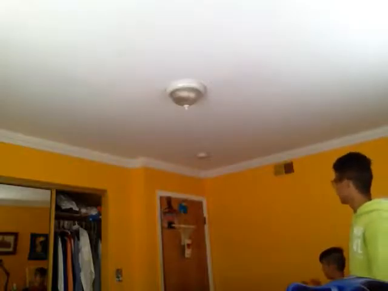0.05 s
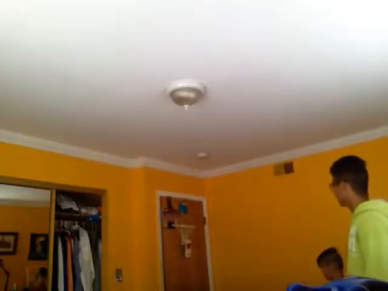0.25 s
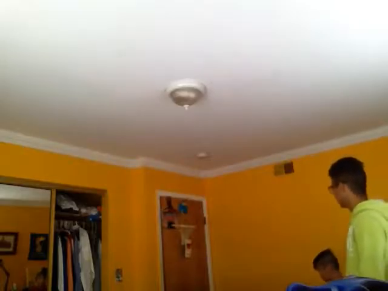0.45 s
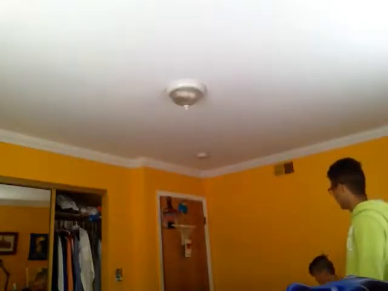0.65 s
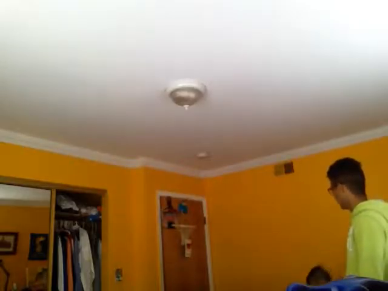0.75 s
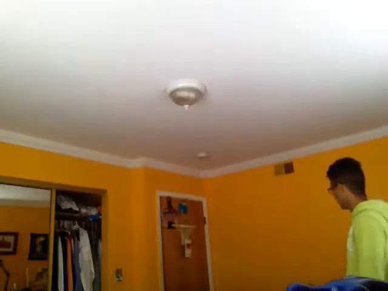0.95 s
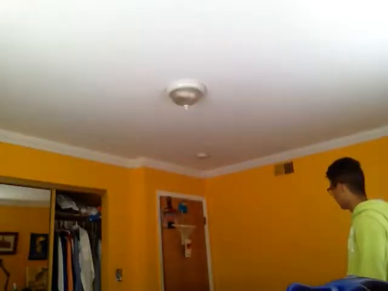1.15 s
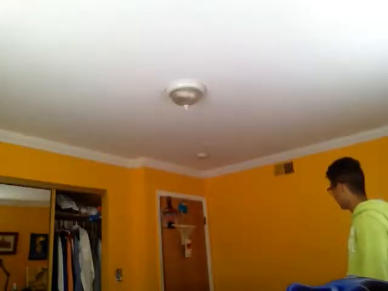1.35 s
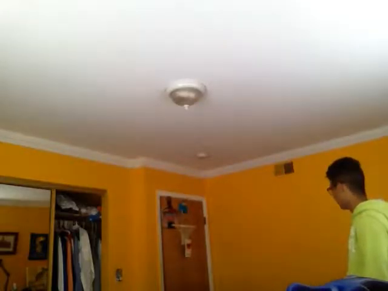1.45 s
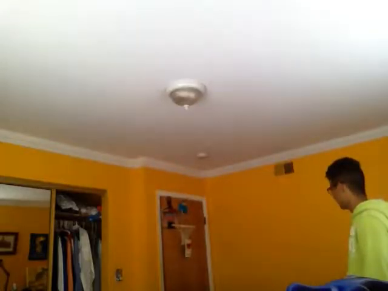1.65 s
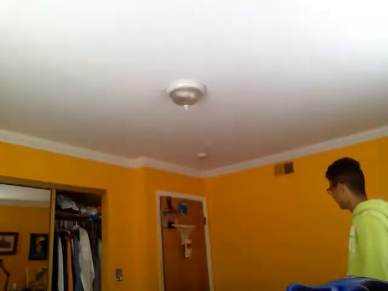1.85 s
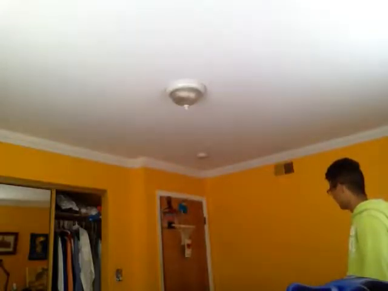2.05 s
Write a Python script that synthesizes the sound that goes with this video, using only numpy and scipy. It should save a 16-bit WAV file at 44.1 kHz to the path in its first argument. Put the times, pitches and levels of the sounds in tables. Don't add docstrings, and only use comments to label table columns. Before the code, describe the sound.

A small rubber basketball bounces on a bedroom's wooden floor, a few metres from the microphone. A low ring fades at the start over soft hum, with faint cloth and shoe squeaks. The loudest, snapping bounce lands at 0.4 s; softer ones follow at 0.9, 1.25, 1.55 and 1.9 s, with short boomy echoes. Palm pats come near 1.0, 1.45 and 1.7 s, with faint rustles and floor groans.

```python
import sys
import numpy as np
from scipy import signal
from scipy.fft import rfft, irfft
from scipy.io import wavfile
from scipy.ndimage import uniform_filter1d

SR = 44100
rng = np.random.default_rng(int(sys.argv[2]) if len(sys.argv) > 2 else 0)


def pcm_store(signal):
    levels = np.round(np.clip(np.atleast_2d(signal), -1, 1) * 32767)
    wavfile.write(sys.argv[1], SR, levels.astype(np.int16).T)


def boost_factor(decibels):
    exponent = np.asarray(decibels, float) / 20
    return 10 ** exponent


N = 92169


def read(points, hz):
    f, value = np.transpose(points)
    return np.interp(np.log(hz + 1), np.log(f + 1), value)


def evened(x):
    return x / np.sqrt(np.mean(x ** 2) + 1e-20)


def rise(t, rise_s):
    return 1 - np.exp(-(t / rise_s) ** 2)


def decay(db, t, t60):
    return boost_factor(db - 60 * t / t60)


def add(mix, s, sound):
    part = mix[max(round(s * SR), 0):][:len(sound)]
    part += sound[:len(part)]


def coloured(points, size):
    spectrum = rfft(rng.standard_normal(size))
    gain = boost_factor(read(points, np.fft.rfftfreq(size, 1 / SR)))
    return evened(irfft(spectrum * gain, size))


BEAT_DB, BEAT_CYCLES = 3, 5.94


def modes(table, t, build_s, cycles, spread):
    hz, db, t60 = np.transpose(table)[:, :, None]
    detune, phase, beat_speed, beat_phase = rng.random((4, len(table), 1))
    hz = hz * (1 + spread * (detune - 0.5))
    swell = rise(t, abs(build_s) + abs(cycles) / hz + 1e-4)
    beat_turns = hz * t * (0.5 + beat_speed) / BEAT_CYCLES + beat_phase
    beat_db = BEAT_DB * np.sin(2 * np.pi * beat_turns)
    tones = np.sin(2 * np.pi * (hz * t + phase))
    return (swell * decay(db + beat_db, t, t60) * tones).sum(0)


# f/Hz, t60/s
ROOM = [(200, 0.39), (600, 0.35), (1500, 0.34), (4000, 0.29), (8000, 0.33), (15000, .2)]


def tail(points, t, rise_s):
    hz, s, bands = signal.stft(coloured(points, len(t)), SR, nperseg=256)
    bands = bands * decay(0, s, read(ROOM, hz)[:, None])
    out = signal.istft(bands, SR, nperseg=256)[1][:len(t)]
    return out * rise(t, rise_s)


# t/s, level/dB, boom below 200 Hz/dB, floor ring/dB, snap/dB
BOUNCES = [
    (0.4095, -7.5, -4, -3, -0.5),
    (0.9168, -15, -6, -5, -1),
    (1.2404, -16.5, 0, 1.5, -1.5),
    (1.5638, -13.5, 2.5, -8.5, -0.5),
    (1.8876, -17.5, 1.5, -1.5, -3.5),
]
# crack f/Hz, crack/dB, fizz above 5 kHz/dB, board ring/dB, thud/dB
SPOTS = [
    (2480, -8, 1.5, -3.5, -14),
    (2110, -8, 4.5, -0.5, -20),
    (1010, 0, 6, -4, -16),
    (2220, -0.5, -1.5, -12.5, -12),
    (1490, -9, 1.5, -9, -14),
]
# f/Hz, level/dB, t60/s
BOOM = [(90.2, -6.5, 0.29), (115.4, -5.5, 0.31), (149.1, -4.5, 0.24), (170.8, -9, 0.36)]
# f/Hz, level/dB, t60/s
RING = [(208, -20.5, 0.54), (240.3, -11, 0.31), (414.1, -15.5, 0.22), (478.4, -10, 0.21),
        (520, -15.5, 0.23), (579.8, -18.5, .25), (645, -26, 0.46), (719, -22.5, 0.31), (749.6, -17.5, 0.24)]
# f/Hz, level/dB, t60/s
BOARD = [(304.3, 0, 0.23), (327.2, -17, 0.39)]
# f/Hz, level/dB, t60/s
SHELL = [(463, -8, 0.014), (1230, 2, 0.024), (1720, -7, 0.031), (2630, -7.5, .012), (3090, -9.5, 0.011),
         (4540, -14, .008), (7010, -24, .02)]
# f/Hz, level per Hz/dB
TOUCH = [(500, -8), (1300, 0), (2300, -4), (4000, -26), (15000, -55)]
# f/Hz, level per Hz/dB
CLICK = [(600, -22), (1500, 3), (3800, -3), (5200, -12), (6500, -28), (15000, -45)]
# delay/s, level/dB
ECHOES = [(0, 1.5), (.0042, -4), (.0057, -4), (.0085, -46), (0.0109, -22), (0.014, -16)]
# f/Hz, level per Hz/dB
WASH = [(200, -5), (400, -9), (700, -10), (900, -16), (1200, -13), (2500, -19.5), (7000, -30.5),
        (15500, -42)]
LEAD_S, SNAP_RISE_S = 0.0042, 0.0007
BUILD_CYCLES = 2.16
PUSH_DB, SHELL_DB, WASH_DB = -15.5, -10, -10.5
TINT_DB, TINT_OCTAVES = 3.5, 0.45


def bounce(s, db, boom_db, ring_db, snap_db, crack_hz, crack_db, fizz_db, board_db, thud_db):
    t = np.arange(SR // 2) / SR
    out = boost_factor(boom_db) * modes(BOOM, t, 0.0017, BUILD_CYCLES, 0.019)
    out += boost_factor(ring_db) * modes(RING, t, 0.0013, BUILD_CYCLES, 0.029)
    out += boost_factor(board_db) * modes(BOARD, t, 0.0045, 2.76, 0.01)
    thud_shape = (t / 0.015) ** 2 * np.exp(2 - 2 * t / 0.013)
    out += boost_factor(thud_db) * thud_shape * np.cos(2 * np.pi * 70 * t)
    push = np.sin(2 * np.pi * 520 * t) * np.minimum(t / 0.00055, 1)
    out += decay(PUSH_DB, t, 0.12) * push

    u = t[:2000]
    out[:2000] += decay(snap_db - 24, u, 0.04) * rise(u, 0.0012) * coloured(TOUCH, len(u))
    crack = decay(crack_db, u, 0.011) * np.sin(2 * np.pi * crack_hz * u)
    crack += decay(-4.5, u, 0.0058) * coloured(CLICK, len(u))
    crack *= rise(u, SNAP_RISE_S)
    for delay, echo_db in ECHOES:
        shell = boost_factor(SHELL_DB) * modes(SHELL, u, SNAP_RISE_S, 0, 0.056)
        arrival_s = LEAD_S - SNAP_RISE_S + delay * rng.uniform(0.9, 1.1)
        add(out, arrival_s, boost_factor(snap_db + echo_db) * (crack + shell))

    wash = []
    for hz, level_db in WASH:
        octaves_off = np.log2(hz / crack_hz)
        tint_db = TINT_DB * np.exp(-(octaves_off / TINT_OCTAVES) ** 2)
        wash.append((hz, level_db + fizz_db * (hz > 5000) + tint_db))
    add(out, 0.7 * LEAD_S, boost_factor(WASH_DB + 1.38 * snap_db) * tail(wash, t, 0.0043))
    return s - LEAD_S, boost_factor(db) * out


# t/s, level/dB, build-up/s, brightness/dB
PATS = [
    (1.012, -21, 0.00062, 1),
    (1.4535, -27, 0.0029, -0.5),
    (1.734, -35, .002, 5),
    (.215, -45, 0.002, 2.5),
]
# f/Hz, level/dB, t60/s
PALM = [(151.2, -13.5, 0.33), (212.7, -4.5, 0.35), (282, -4.5, 0.21), (387.3, -5, 0.15), (489, -15, 0.14),
        (575, -20, 0.37), (645, -14.5, 0.27), (1020, -14, 0.067)]
# f/Hz, level per Hz/dB
PAT_WASH = [(150, -7), (400, 6.5), (1000, -4), (2000, -18.5), (5000, -34), (15000, -37)]


def pat(s, db, build_s, bright_db):
    t = np.arange(SR // 2) / SR
    slap = decay(4, t, 0.04) * np.sin(2 * np.pi * 330 * t) * rise(t, 0.004)
    ring = modes(PALM, t, build_s, 0.8, 0.024)
    wash = boost_factor(bright_db - 9.5) * tail(PAT_WASH, t, build_s + 0.0042)
    return s, boost_factor(db) * (slap + ring + wash)


# t/s, length/s, level/dB, f/Hz
GROANS = [
    (1.75, 0.075, -29, 213),
    (1.11, 0.05, -36, 198),
    (1.16, 0.034, -47, 207),
    (0.597, .08, -50.5, 82),
]


def groan(s, length, db, hz):
    t = np.arange(0, length, 1 / SR)
    drift = uniform_filter1d(rng.standard_normal((2, SR)), 600)
    waver, flutter = evened(uniform_filter1d(drift, 600))[:, :len(t)]
    swell = boost_factor(db + 2 * flutter) * np.sin(np.pi * t / length) ** 1.6
    turns = np.cumsum(hz * (1 + 0.025 * waver)) / SR
    return s, swell * np.sin(2 * np.pi * turns)


# t/s, length/s, level/dB, low f/Hz, high f/Hz
RUSTLES = [
    (0.061, 0.17, -56, 365, 740.7),
    (0.29, 0.45, -58, 370, 3241),
    (1.0, 0.27, -61, 4000, 14900),
    (1.062, 0.15, -54.5, 800, 3800),
    (1.735, .13, -49.5, 833.3, 2600),
    (1.73, 0.14, -56.5, 4320, 13200),
    (1.187, 0.11, -56.5, 4630, 14000),
    (1.762, 0.11, -49, 60, 131),
    (1.931, .1, -45.5, 520, 730),
]
# t/s, length/s, level/dB, low f/Hz, high f/Hz
TICKS = [
    (1.016, .008, -51, 8000, 15000),
    (1.117, .012, -59, 5000, 11000),
    (1.177, .007, -54, 3800, 5200),
    (1.181, .006, -60, 8000, 9800),
    (1.199, .007, -50, 7500, 13000),
    (1.201, .007, -59, 3800, 5000),
    (1.225, .008, -60, 7000, 14000),
    (1.469, .008, -56, 1800, 3200),
]


def rustle(s, length, db, low_hz, high_hz):
    t = np.arange(0, length, 1 / SR)
    unevenness = evened(uniform_filter1d(rng.standard_normal(SR), 150))[:len(t)]
    grain = rng.standard_normal(len(t)) * boost_factor(0.74 * unevenness)
    sos = signal.butter(2, [low_hz, min(high_hz, 15900)], "bandpass", fs=SR, output="sos")
    band = signal.sosfilt(sos, grain)
    return s, boost_factor(db) * evened(band) * np.sin(np.pi * (t / length) ** 0.48)


# t/s, length/s, level/dB, f/Hz
SQUEAKS = [
    (0.105, .13, -62.5, 1787),
    (0.318, 0.11, -55, 1812),
    (1.332, 0.067, -52.5, 1760),
    (1.392, 0.076, -64, 1840),
]


def squeak(s, length, db, hz):
    t = np.arange(0, length, 1 / SR)
    sos = signal.butter(2, 110, fs=SR, output="sos")
    slow = signal.sosfilt(sos, rng.standard_normal((2, SR)))[:, 4000:][:, :len(t)]
    whistle = ((slow[0] + 1j * slow[1]) * np.exp(2j * np.pi * hz * t)).real
    return s, boost_factor(db) * np.sin(np.pi * t / length) ** 0.5 * evened(whistle)


def fading():
    t = np.arange(SR // 4) / SR
    ring = np.cos(2 * np.pi * 165 * t) + 0.52 * np.cos(2 * np.pi * 215 * t)
    ring += 0.5 * np.exp(-t / 0.0039)
    return decay(-41.5, t, 0.37) * ring


# f/Hz, level per Hz/dB
HUM = [(35, -54), (60, -12.5), (278, 0), (433, -14.5), (689, -11.5), (739, -20), (1550, -19), (1830, -26),
       (15500, -32.5)]


def house_hum():
    return boost_factor(-52) * coloured(HUM, N)


def scene():
    mix = house_hum()
    add(mix, 0, fading())
    bounces = np.hstack([BOUNCES, SPOTS])
    for source, table in ((bounce, bounces), (pat, PATS), (groan, GROANS),
                          (rustle, RUSTLES), (rustle, TICKS), (squeak, SQUEAKS)):
        for row in table:
            add(mix, *source(*row))
    return mix[None]


def top_cut(x):
    return signal.sosfilt(signal.butter(12, 15670, fs=SR, output="sos"), x)


def record(dry):
    bass_cut = signal.butter(2, 60, "highpass", fs=SR, output="sos")
    treble_cut = signal.firwin(401, 15500, window=("kaiser", 9), fs=SR)
    mix = signal.sosfilt(bass_cut, dry)
    mix = signal.oaconvolve(mix, treble_cut[None], "same")
    return top_cut(mix)


dry = scene()
out = record(dry)
pcm_store(out)
```